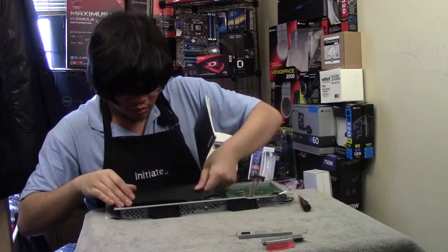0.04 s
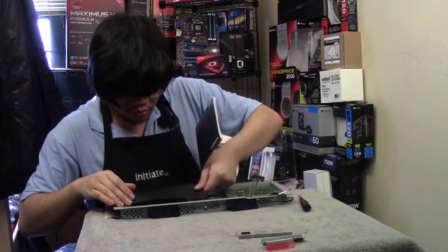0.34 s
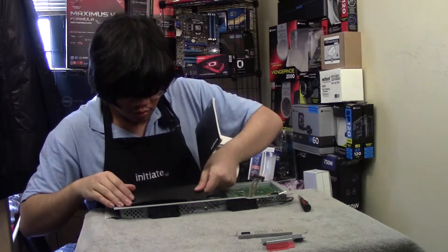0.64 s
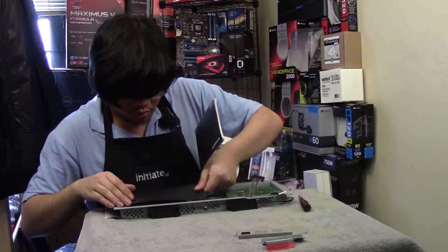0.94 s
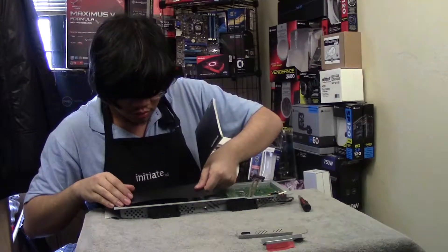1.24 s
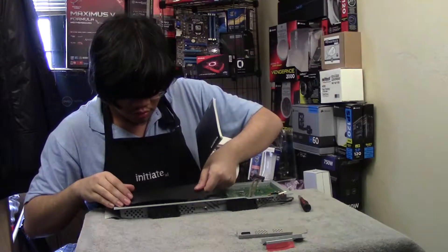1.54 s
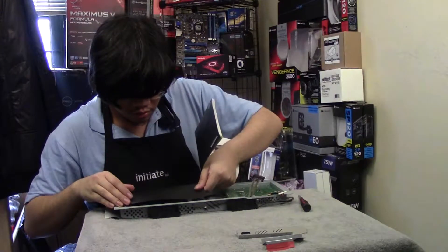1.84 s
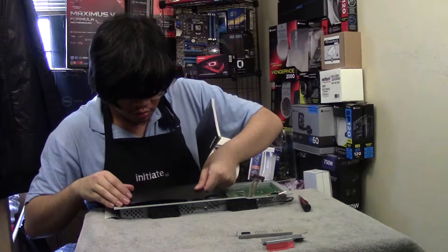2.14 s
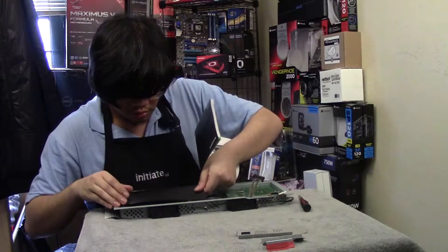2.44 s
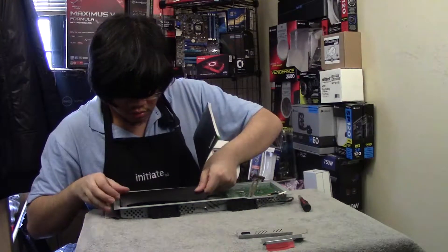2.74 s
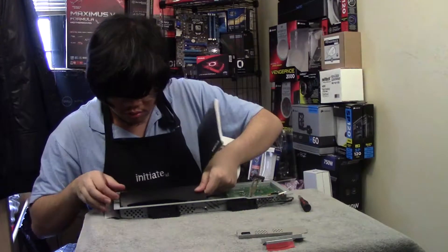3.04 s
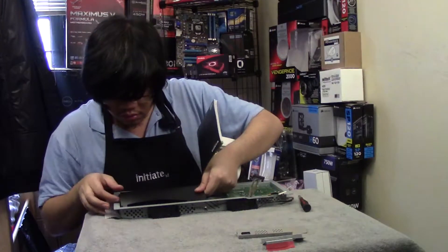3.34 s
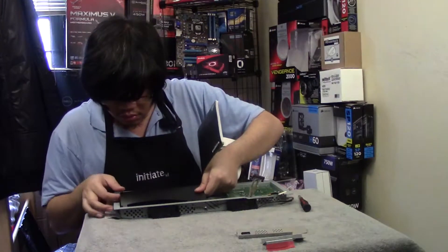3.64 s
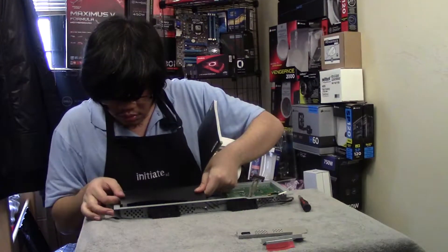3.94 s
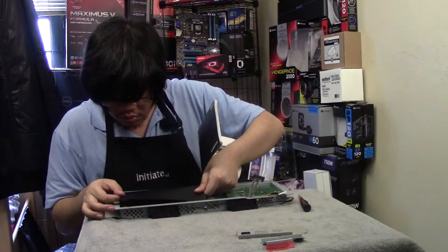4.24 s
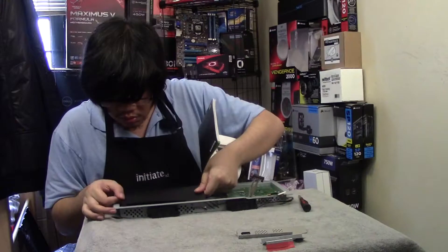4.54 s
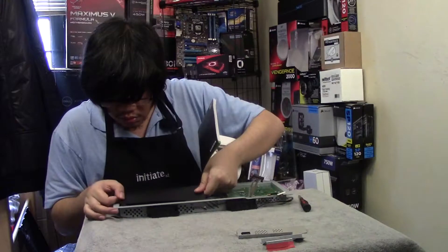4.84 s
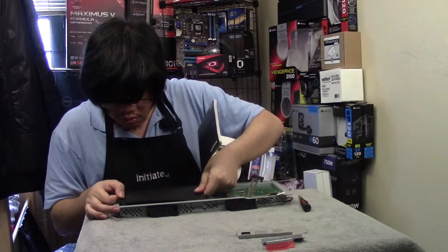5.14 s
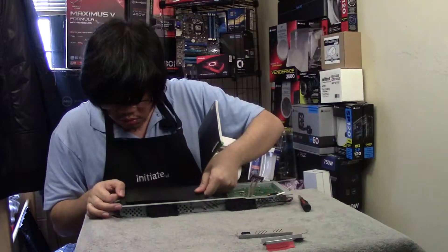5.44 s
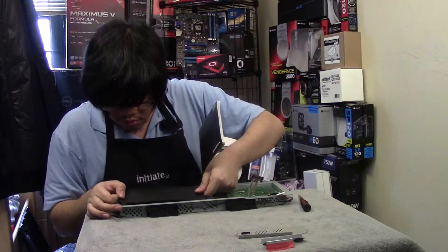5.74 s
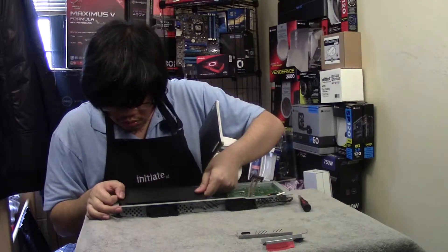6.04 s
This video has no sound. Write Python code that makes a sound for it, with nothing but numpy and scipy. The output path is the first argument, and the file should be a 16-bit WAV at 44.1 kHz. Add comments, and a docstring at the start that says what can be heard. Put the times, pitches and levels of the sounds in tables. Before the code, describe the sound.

Sharp plastic snaps and faint rubbing as a stiff sheet is pressed into a thin metal frame on a table.

```python
"""Sharp plastic snaps and faint rubbing: two hands press a stiff sheet into a thin metal chassis
on a cloth-covered table in a small, crowded room. The sheet's edge rubs along the rim, sticks,
snaps past it and lands a few milliseconds later; once it seats hard and thumps the table.
Fingertips knock, the edge ticks and the plastic squeaks once.
Behind it are a low room rumble, microphone hiss and a faint electronic whine."""
import sys
import numpy as np
from scipy import signal
from scipy.fft import rfft, irfft
from scipy.io import wavfile

SR = 44100
rng = np.random.default_rng(int(sys.argv[2]) if len(sys.argv) > 2 else 0)


def store_pcm(level_fs):
    """Save levels as 16-bit WAV."""
    pcm = np.round(np.clip(level_fs, -1, 1) * 32767).astype(np.int16)
    wavfile.write(sys.argv[1], SR, np.atleast_2d(pcm).T)


N = 277830
T = np.arange(SR // 2) / SR  # time within one event [s]


def from_db(db):
    """Decibels to gain."""
    return 10 ** (np.asarray(db) / 20)


def rms_one(x):
    """Scale to rms 1."""
    return x / np.sqrt(np.mean(x ** 2) + 1e-20)


def at_hz(points, hz, column=1):
    """Interpolate a table column over log frequency."""
    points = np.array(points)
    return np.interp(np.log(hz + 1e-9), np.log(points[:, 0]), points[:, column])


def filtered(x, hz, kind, order=2):
    """Butterworth filter."""
    return signal.sosfilt(signal.butter(order, hz, kind, fs=SR, output="sos"), x)


def fade(t60_s):
    """Decay of 60 dB per t60_s."""
    return np.exp(-np.log(1000) * T / t60_s)


def rise(tau_s):
    """Exponential attack from 0 to 1."""
    return 1 - np.exp(-T / tau_s)


def ring(modes):
    """Impulse response of a set of modes; neighbours alternate in sign."""
    return sum((-1) ** k * from_db(db) * np.sin(2 * np.pi * hz * T) * fade(t60_s)
               for k, (hz, db, t60_s) in enumerate(modes))


def add(track, time_s, sound):
    """Mix a sound into the track."""
    start = max(round(time_s * SR), 0)
    track[start:start + len(sound)] += sound[:max(N - start, 0)]


# sheet and chassis together, hand-damped: (frequency [Hz], level [dB], t60 [s])
BODY_MODES = [(348, -20, 0.078), (516, -17, 0.024), (628, -16.5, 0.06), (803, -15, 0.053),
              (911, -17.5, 0.13), (990, -9, 0.05), (1125, -17.5, 0.046), (1336, -6, 0.017),
              (1464, -5, 0.02), (1750, -6.5, 0.014), (1930, -2.5, 0.0039), (2565, -14, 0.031),
              (2825, -9, 0.005), (3160, -24.5, 0.039), (3866, -17.5, 0.034), (5100, -17, 0.018)]
# table top: (frequency [Hz], level [dB], t60 [s])
TABLE_MODES = [(121.6, -2, 0.052), (156, -2.5, 0.062), (218, -6, 0.066), (264, -11.5, 0.11)]
# edge passing the rim: (time [s], release [dB], flight [s], landing [dB], span at release [Hz],
#   span at landing [Hz], span ring [dB], contact cutoff [Hz], crack [dB], table thump [dB])
EDGE_SNAPS = [ (0.1565, -26.5, 0.0079, -28.5, 1540, 1020, 4.5, 3140, -13.5, -23.5),
              (0.519, -34, 0.0055, -35, 960, 1476, 3.5, 2060, -20, -30),
              (0.807, -34, 0.006, -44, 1080, 1110, 10, 2970, -9, -35),
              (0.8300, -46, 0.0055, -36, 1010, 1620, 1, 3200, -2, -24),
              (1.1830, -29.5, 0.0055, -34, 1524, 992, 5, 2800, -17.5, -27),
              (1.466, -33, 0.0028, -48, 1033, 1334, 7.5, 2910, -12.5, -22),
              (1.9205, -28, 0.0024, -30.5, 1540, 1010, 0, 2900, -20.5, -19.5),
              (4.205, -24, 0.0015, -13, 2100, 1340, 0, 2950, -6.5, -18),
              (5.4533, -33.5, 0.0028, -39.5, 935, 1370, 2.5, 3200, -13, -11),
              (6.0196, -28.5, 0.0042, -30, 1342, 1393, 5.5, 4530, -12, -32), ]


def snaps(span_t60_s=0.019, crack_band_hz=(2400, 5000), landing_crack_db=-12.5):
    """Release and landing each kick the chassis, ring the sheet's free span, crack and nudge the table."""
    out, body, table = np.zeros(N), ring(BODY_MODES), ring(TABLE_MODES)
    tails = iter(room_tails(2 * len(EDGE_SNAPS)))
    for (time_s, release_db, flight_s, landing_db, release_hz, landing_hz,
         span_db, contact_hz, crack_db, thump_db) in EDGE_SNAPS:
        pinned = body * fade(0.015 / from_db(thump_db))  # pressed harder: more thump, less ring
        knock = filtered(pinned, contact_hz, "low")
        thump = from_db(thump_db) * table
        release = (time_s, release_db, release_hz, crack_db)
        landing = (time_s + flight_s, landing_db, landing_hz, crack_db + landing_crack_db)
        for start_s, db, span_hz, grit_db in (release, landing):
            span = ring([(span_hz, span_db, span_t60_s)]) * rise(tau_s=0.00045)
            grit = rms_one(filtered(rng.standard_normal(len(T)), crack_band_hz, "band", order=3))
            crack = from_db(grit_db) * grit * rise(tau_s=0.00078) * fade(t60_s=0.024)
            snap = knock + span + crack + thump
            add(out, start_s, from_db(db) * in_room(snap, next(tails), send_db=-1))
    return out


# fingertips on the held sheet: (time [s], level [dB], pitch [Hz])
FINGER_TAPS = [(0.393, -33, 750), (2.5730, -45.5, 940), (5.4430, -28, 870)]


def taps(t60_s=0.0063, contact_hz=1700, body_db=-8.5):
    """The finger stays on the sheet and damps it at once: a dry, dull knock."""
    out, body = np.zeros(N), from_db(body_db) * ring(BODY_MODES)
    for (time_s, db, hz), tail in zip(FINGER_TAPS, room_tails(len(FINGER_TAPS))):
        sheet = ring([(hz, 0, t60_s)])
        knock = filtered(sheet + body, contact_hz, "low", order=4)
        add(out, time_s, from_db(db) * in_room(knock, tail, send_db=-8.5))
    return out


# edge sliding on the rim: (centre time [s], half-length [s], level [dB])
EDGE_RUBS = [ (0.060, 0.092, -66), (0.142, 0.016, -56), (0.585, 0.02, -66), (0.8, 0.0084, -44),
             (0.914, 0.043, -54.5), (0.952, 0.04, -54), (1.133, 0.045, -58), (1.174, 0.036, -55),
             (1.462, 0.0074, -41), (1.547, 0.012, -59), (3.650, 0.019, -65), (3.813, 0.047, -63),
             (4, 0.037, -56.5), (4.122, 0.028, -58.5), (6.161, 0.02, -55), ]


def rubs(slips_per_s=2000, spread_db=3.0, gentle_cutoff_hz=1170, cutoff_doubles_db=-45):
    """Dense tiny slips drive the body modes, damped by the sliding edge; harder strokes are brighter."""
    out, body = np.zeros(N), ring(BODY_MODES) * fade(t60_s=0.071)
    for (centre_s, half_s, db), tail in zip(EDGE_RUBS, room_tails(len(EDGE_RUBS))):
        slips = (rng.random(len(T)) < slips_per_s / SR) * rng.choice([-1, 1], len(T))
        slips = slips * from_db(spread_db * rng.standard_normal(len(T)))
        stroke = np.sin(np.pi * np.clip(T / (2 * half_s), 0, 1)) ** 2
        cutoff_hz = gentle_cutoff_hz * (1 + from_db(db - cutoff_doubles_db) ** 2)
        ringing = signal.fftconvolve(slips * stroke, body)[:len(T)]
        scrape = filtered(ringing, cutoff_hz, "low")
        rub = rms_one(in_room(scrape, tail, send_db=0.5))
        rub *= np.sqrt(half_s / T[-1])  # energy of rms 1 over half_s
        add(out, centre_s - half_s, from_db(db) * rub)
    return out


# edge giving way by a hair: (time [s], level [dB])
EDGE_TICKS = [(0.1865, -31.5), (1.344, -54), (2.119, -56), (3.107, -57), (3.505, -53), (4.1333, -40),
              (4.442, -52.5), (6.1534, -46), (6.195, -39)]


def ticks(contact_hz=1450, span_hz=1400, span_db=-7.0, span_t60_s=0.012):
    """Soft contacts: a dull knock on the chassis and a short ring of the sheet."""
    out = np.zeros(N)
    knock = filtered(ring(BODY_MODES), contact_hz, "low")
    span = ring([(span_hz, span_db, span_t60_s)])
    for (time_s, db), tail in zip(EDGE_TICKS, room_tails(len(EDGE_TICKS))):
        add(out, time_s, from_db(db) * in_room(knock + span, tail, send_db=-10))
    return out


def squeak(time_s=0.354, length_s=0.034, centre_hz=3180, level_db=-62.5, waver_hz=40):
    """Brief periodic stick-slip of the plastic: one thin chirp."""
    out = np.zeros(N)
    waver = rms_one(filtered(rng.standard_normal(len(T)), 150, "low"))
    pitch_hz = centre_hz + waver_hz * waver
    tone = np.sin(2 * np.pi * np.cumsum(pitch_hz) / SR)
    swell = np.sin(np.pi * np.clip(T / length_s, 0, 1))
    add(out, time_s, from_db(level_db) * swell * tone)
    return out


# diffuse room response: (frequency [Hz], level [dB], early t60 [s])
ROOM_BANDS = [(99.4, -5.5, 0.09), (300, -4, 0.16), (700, 3.5, 0.11), (1380, 0.5, 0.076),
              (2586, -0.5, 0.099), (4600, -12, 0.091), (9000, 2, 0.052)]


def room_tails(count, diffuse_db=-27.5, late_db=-16.0, late_t60_s=0.29, gap_s=0.0022):
    """One scattered response per contact: shelves answer quickly, walls linger faintly."""
    edges_hz = np.geomspace(70, 14000, 12)
    white = rng.standard_normal((count, 2, len(T)))
    tails = 0
    for k, (low_hz, high_hz) in enumerate(zip(edges_hz, edges_hz[1:])):
        hz = np.sqrt(low_hz * high_hz)
        band = from_db(at_hz(ROOM_BANDS, hz)) * filtered(white[:, k % 2], [low_hz, high_hz], "band")
        early = fade(at_hz(ROOM_BANDS, hz, column=2))
        late = from_db(late_db) * fade(late_t60_s)
        tails = tails + band * (early + late)
    onset = 1 - np.exp(-(T / gap_s) ** 4)
    return from_db(diffuse_db) * tails * onset


def in_room(sound, tail, send_db):
    """Direct sound plus room response."""
    return sound + from_db(send_db) * signal.fftconvolve(sound, tail)[:len(T)]


# rumble and hiss spectrum: (frequency [Hz], relative density [dB])
FLOOR_SPECTRUM = [(10, -6.5), (22, -3), (33, 0), (60, -5), (100, -11.5), (150, -15), (250, -17), (400, -23),
                  (550, -21.5), (1000, -26.5), (2000, -29), (7000, -31.5), (12000, -34), (15500, -37)]


def noise_floor(rms_db=-57):
    """Steady room rumble and microphone hiss."""
    hz = np.arange(N // 2 + 1) * SR / N
    spectrum = rfft(rng.standard_normal(N)) * from_db(at_hz(FLOOR_SPECTRUM, hz))
    return from_db(rms_db) * rms_one(irfft(spectrum, N))


# electronic tones: (frequency [Hz], rms level [dB])
WHINE_PARTIALS = [(2003, -84.5), (4000, -78.5), (6002, -85.5), (8000, -92), (10002, -93)]


def whine():
    """Steady electronic whine near multiples of 2 kHz."""
    t = np.arange(N) / SR
    return sum(np.sqrt(2) * from_db(db) * np.sin(2 * np.pi * hz * t) for hz, db in WHINE_PARTIALS)


def scene():
    """One microphone feeds both channels."""
    mono = snaps() + taps() + rubs() + ticks() + squeak() + noise_floor() + whine()
    return np.tile(mono, (2, 1))


def record(dry, cutoff_hz=15750):
    """Steep elliptic low-pass."""
    return signal.sosfilt(signal.ellip(12, .1, 70, cutoff_hz, fs=SR, output="sos"), dry)


dry = scene()
out = record(dry)
store_pcm(out)
```